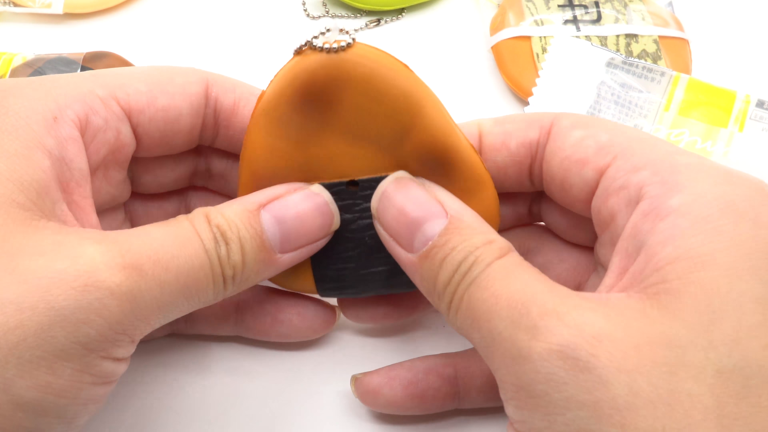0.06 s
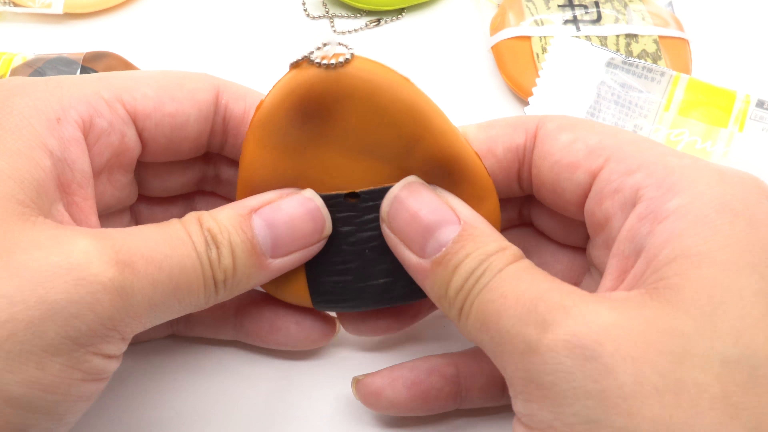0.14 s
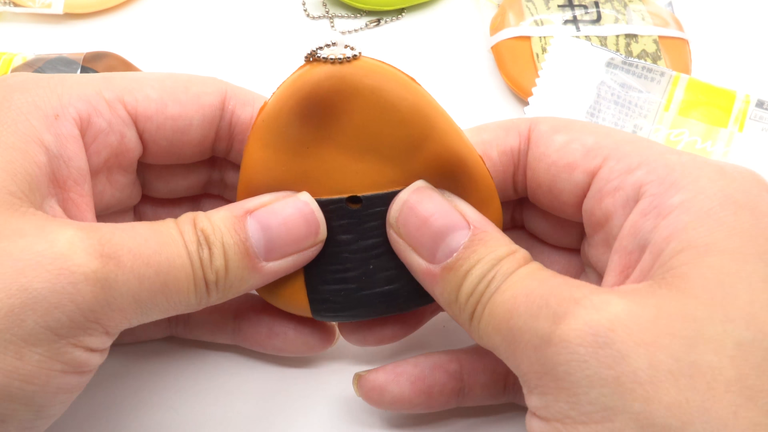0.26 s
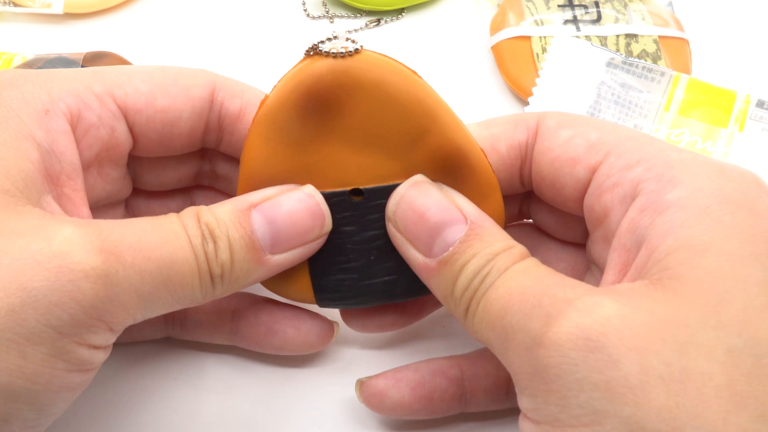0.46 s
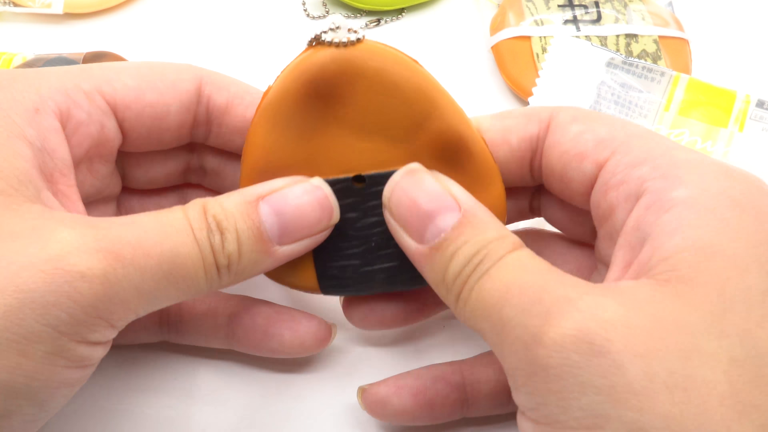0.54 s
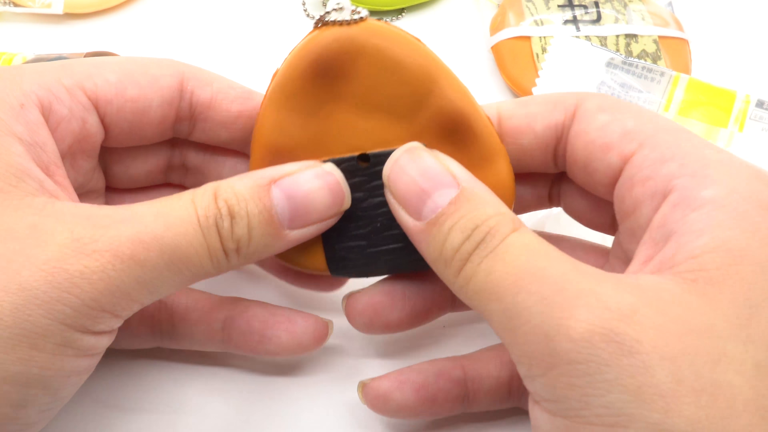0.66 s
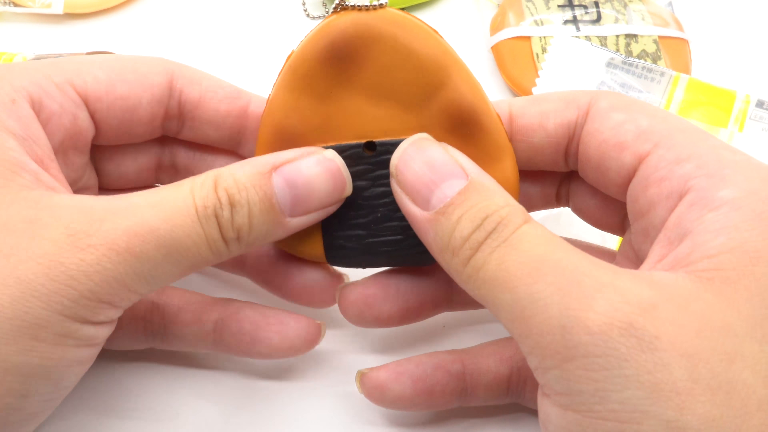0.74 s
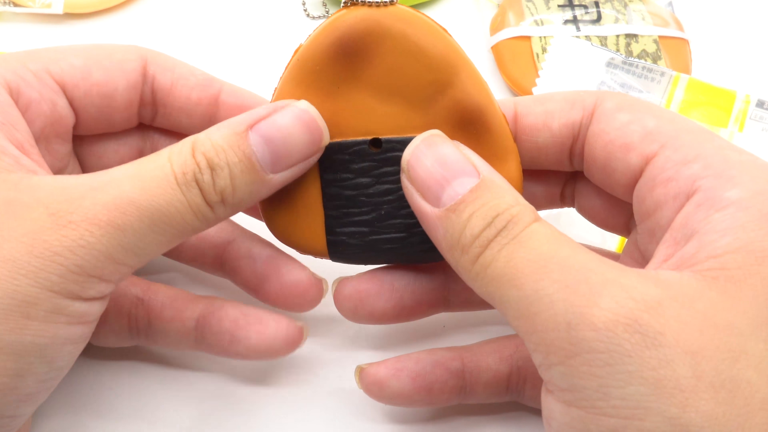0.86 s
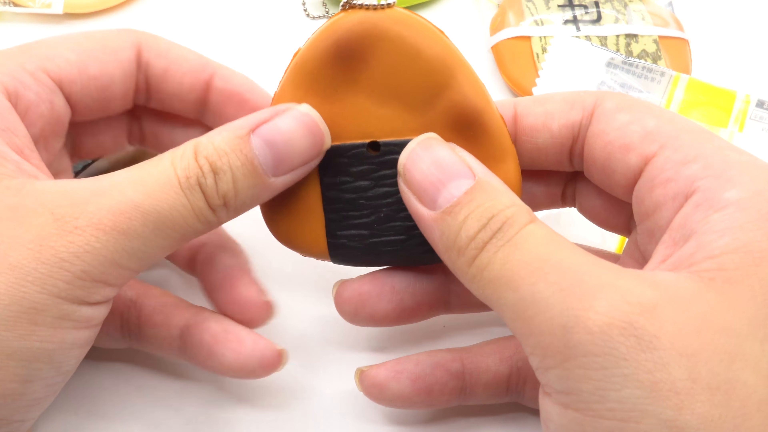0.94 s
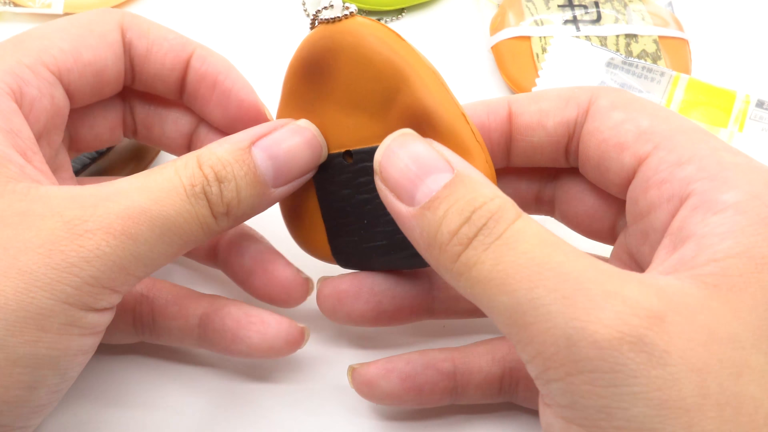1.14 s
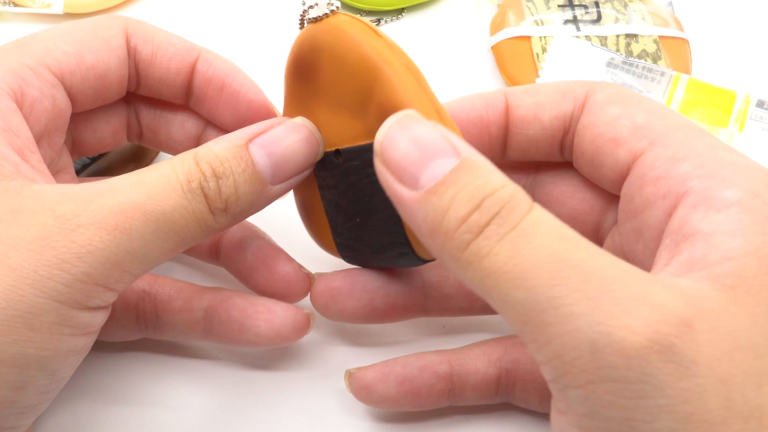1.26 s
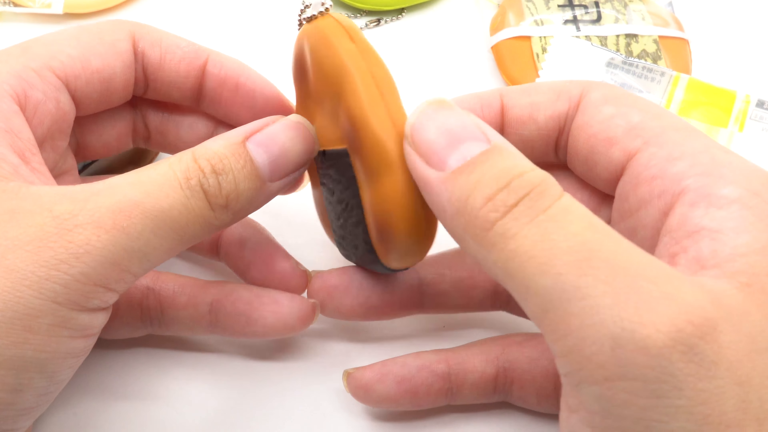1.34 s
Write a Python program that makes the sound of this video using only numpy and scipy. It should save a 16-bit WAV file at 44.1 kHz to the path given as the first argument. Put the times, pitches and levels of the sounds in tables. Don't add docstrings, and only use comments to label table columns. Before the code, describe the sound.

A hollow toy shell snaps sharply under two thumbs, a softer click running straight into a louder crack with a short room echo and faint desk thud; then tiny finger ticks and rubs, close stereo microphone.

```python
import sys
import numpy as np
from scipy import signal
from scipy.io import wavfile

SR = 44100
rng = np.random.default_rng(int(sys.argv[2]) if len(sys.argv) > 2 else 0)


def output_pcm(signal):
    pcm = np.clip(np.atleast_2d(signal).T, -1, 1) * 32767
    wavfile.write(sys.argv[1], SR, np.round(pcm).astype(np.int16))


def invert_db(x):
    u = np.asarray(x, float) / 20
    return 10 ** u


N = 61739

# f/Hz, level/dB per Hz
AIR_SPECTRUM = [(25, -98), (50, -82.5), (150, -82.5), (400, -92.5), (1200, -100), (3500, -105),
                (9000, -107), (15000, -109)]
# f/Hz, level/dB
AIR_SIDE_OVER_MID = [(60, -28), (180, -11.5), (550, -1), (1650, 0.5), (5000, -1), (15000, -3)]
# f/Hz, width/Hz, level/dB
HUM_RESONANCES = [(53.36, 3.8, -55), (101.5, 11.7, -59), (141.2, 11, -63), (285.2, 14, -72),
                  (623, 2.6, -78)]
# t/s, level/dB
HUM_SWELL = [(0.0, -50), (0.07, -64), (0.1, -64), (0.408, -54), (0.45, -70), (0.486, -58.5), (1.066, -60.5),
             (1.102, -52.5), (1.186, -71), (1.242, -51), (1.362, -55.5), (1.4, -64)]
# t/s, level/dB, f/Hz, spread/s, ring length/cycles
FINGER_TICKS = [(0.0616, -41.5, 5850, 0.0084, 5), (.061, -49.5, 900, 0.0022, 8),
                (.0806, -47, 2200, 0.00082, 5), (0.0804, -47, 5530, 0.0012, 3.6),
                (0.081, -53, 900, 0.0046, 6), (0.095, -41, 5350, 0.0066, 6.6),
                (0.095, -55, 2000, 0.0056, 8.4), (.095, -50, 900, 0.0036, 7.3),
                (0.097, -46, 7800, 0.0032, 12), (0.554, -48, 1290, .008, 4.2),
                (.607, -54, 900, 0.0034, 4.5), (.663, -46, 850, 0.0048, 10),
                (.667, -43.5, 1660, 0.0082, 5.1), (.705, -39.5, 4450, .004, 1.8),
                (0.754, -47, 990, 0.0035, 6.2), (.7638, -43, 850, .006, 10),
                (0.7647, -42.5, 1660, 0.00529, 8.5), (0.7636, -45.5, 3300, 0.0088, 5),
                (0.777, -51, 1500, 0.0025, 5.4), (0.8802, -40, 2200, 0.0011, 2.4),
                (1.0809, -48.5, 700, 0.00593, 12), (1.078, -49.5, 1970, 0.004, 12),
                (1.0842, -49.5, 1496, .003, 30), (1.118, -52, 2450, .003, 27)]
# t/s, length/s, level/dB, f/Hz
SKIN_RUBS = [
    (0.061, .07, -66, 6000),
    (0.64, 0.065, -68.5, 7000),
    (0.651, 0.059, -62.5, 1500),
    (0.695, 0.033, -62.5, 7000),
    (0.732, 0.088, -65, 7900),
    (0.87, 0.036, -68.5, 6000),
    (0.91, 0.034, -65.5, 1800),
    (1.028, 0.14, -71, 1600),
    (1.11, 0.034, -70, 3200),
]
# f/Hz, near level/dB, near t60/s, far level/dB, far t60/s
ROOM_DECAY = [(100, -34, .08, -41, .4), (330, -21.5, 0.059, -20.5, 0.64), (694, -19.5, .03, -20.5, 0.39),
              (1210, -8, 0.069, -20, 0.38), (2110, -2.7, 0.037, -10, 0.26), (3300, -16, 0.039, -25, 0.3),
              (7000, -18.5, 0.043, -36, 0.52), (14300, -30, 0.062, -49, 0.19)]
# f/Hz, correlation/1
ECHO_LIKENESS = [(100, .98), (400, 1), (900, 0.56), (2000, 0.13), (4000, 0.04), (12000, .3)]
# t/s, level/dB, pan left minus right/dB, crumbling after-sound level/dB
SHELL_SNAPS = [
    (0.2486, -22, 1.7, -22.5),
    (0.2675, -12, -2, -12),
]
# delay t/s, level/dB
SNAP_SLIPS = [
    [(0.0002, 8), (0.0018, 1.5), (0.0045, -14)],
    [(0.00015, 3.5), (0.0011, -7), (0.0019, -20)],
]
# f/Hz, t60/s, first snap level/dB, second snap level/dB
SHELL_MODES = [(337, 0.014, -12, -7), (900, 0.0078, -5.5, 0), (1640, 0.007, -4, -3),
               (2200, 0.0067, -18, -6.5), (3200, 0.0021, -9.5, -5.5), (4380, 0.0021, -9.5, -8.5),
               (5700, 0.0049, -19.5, -21.5), (7200, 0.0015, -20, -7.5), (9550, 0.0024, -20.5, -20),
               (13300, 0.0013, -30, -25)]
# delay t/s, f/Hz, level/dB, t60/s
DESK_BOOMS = [
    (.010, 100, -31, 0.16),
    (0.014, 155, -38.5, 0.13),
    (.03, 300.2, -55, 0.53),
]

ECHO_RISE_S, ECHO_HOLD_S = 0.0022, 0.0086
FIRST_ECHO_DULL_HZ = 3560
BOOM_RISE_S = 0.0032


def rms_one(x):
    return x / np.sqrt(np.mean(x ** 2) + 1e-20)


def at_hz(points, hz, axis=1):
    points = np.array(points)
    return np.interp(np.log(hz), np.log(points[:, 0]), points[:, axis])


def click(s, db):
    return invert_db(db) * (np.arange(N) == int(s * SR))


def ring(clicks, hz, t60):
    radius = invert_db(-60 / (t60 * SR))
    angle = 2 * np.pi * hz / SR
    feedback = [1, -2 * radius * np.cos(angle), radius * radius]
    return signal.lfilter([0, np.sin(angle)], feedback, clicks + 1e-18)


def bands(size, alike_of, gain_at):
    out = 0
    edges = 20 * 2 ** np.arange(0, 10.1, .5)
    settle = 8000
    white = rng.standard_normal((2, 2, size + settle))
    for k, (low, high) in enumerate(zip(edges, edges[1:])):
        sos = signal.butter(2, [low, min(high, .45 * SR)], "band", fs=SR, output="sos")
        mid, side = signal.sosfilt(sos, white[k % 2])[:, settle:]
        hz = np.sqrt(low * high)
        alike = np.clip(alike_of(hz), -1, 1)
        stereo = np.sqrt(1 + alike) * mid + np.sqrt(1 - alike) * side * [[1], [-1]]
        out = out + gain_at(hz) * stereo
    return out


def air():
    def alike(hz):
        return np.tanh(-at_hz(AIR_SIDE_OVER_MID, hz) * np.log(10) / 20)

    def gain(hz):
        return invert_db(at_hz(AIR_SPECTRUM, hz)) * np.sqrt(SR / 2 / (1 + alike(hz)))

    return bands(N, alike, gain)


def hum():
    s, db = np.transpose(HUM_SWELL)
    swell = invert_db(np.interp(np.arange(N) / SR, s, db - db.mean()))
    out = 0
    for k, (hz, width, level_db) in enumerate(HUM_RESONANCES):
        noise = rng.standard_normal(N + SR)
        tone = ring(noise, hz, 2.2 / width)[SR:]
        out = out + invert_db(level_db) * rms_one(tone) * (swell if k == 0 else 1)
    return out


def ticks():
    out = np.zeros(N)
    draws = rng.random((len(FINGER_TICKS), 2, 5))
    for (s, db, hz, spread, cycles), (when, size) in zip(FINGER_TICKS, draws):
        clicks = click(s, db)
        places = ((s + spread * when) * SR).astype(int)
        np.add.at(clicks, places, (size - .5) * 1.4 * invert_db(db))
        out += ring(clicks, hz, cycles / hz)
    return out


def rubs():
    t, out = np.arange(N) / SR, 0
    for s, length, db, hz in SKIN_RUBS:
        sos = signal.butter(1, [hz * .5, min(hz * 1.7, .45 * SR)], "band", fs=SR, output="sos")
        mid, side = rms_one(signal.sosfilt(sos, rng.standard_normal((2, N))))
        swell = np.sin(np.pi * np.clip((t - s) / length, 0, 1))
        out = out + invert_db(db) * swell * (mid + 0.75 * side * [[1], [-1]])
    return out


def room(x):
    t = np.arange(SR // 2) / SR

    def fade(hz):
        near_db, near_t60, far_db, far_t60 = (at_hz(ROOM_DECAY, hz, axis=k) for k in range(1, 5))
        near = invert_db(near_db - 60 * np.maximum(t - ECHO_HOLD_S, 0) / near_t60)
        far = invert_db(far_db - 60 * t / far_t60)
        return near + far

    echo = bands(len(t), lambda hz: at_hz(ECHO_LIKENESS, hz), fade)
    echo = echo * (1 - np.exp(-(t / ECHO_RISE_S) ** 2))
    return signal.fftconvolve(echo, x[None], axes=1)[:, :N]


def snap(k):
    s, db = SHELL_SNAPS[k][:2]
    push = click(s, db)
    for j, (lag, slip_db) in enumerate(SNAP_SLIPS[k]):
        push = push - click(s + lag, db + slip_db) * (-1) ** j
    out = 0
    for j, mode in enumerate(SHELL_MODES):
        sign = (-1) ** (j + k + 1)
        out = out + sign * invert_db(mode[2 + k]) * ring(push, mode[0], mode[1])
    return out


def booms():
    t, out = np.arange(N) / SR, 0
    for lag, hz, db, t60 in DESK_BOOMS:
        since = np.maximum(t - SHELL_SNAPS[-1][0] - lag, 0)
        envelope = invert_db(db - 60 * since / t60) * (1 - np.exp(-since / BOOM_RISE_S))
        out = out + envelope * np.sin(2 * np.pi * hz * since)
    return out


def scene():
    touches = ticks()
    direct = 0
    for k, row in enumerate(SHELL_SNAPS):
        pan = invert_db([[row[2] / 2], [-row[2] / 2]])
        direct = direct + snap(k) * pan
    first, second = (click(row[0], row[3]) for row in SHELL_SNAPS)
    pole = np.exp(-2 * np.pi * FIRST_ECHO_DULL_HZ / SR)
    dull_first = signal.lfilter([1 - pole], [1, -pole], first)
    sent = dull_first + second + invert_db(-26) * touches
    return direct + touches + room(sent) + booms() + air() + hum() + rubs()


def low_pass(x):
    return signal.sosfilt(signal.butter(12, 16650, fs=SR, output="sos"), x)


def record(dry):
    cut = signal.sosfilt(signal.cheby2(16, 30, 15900, fs=SR, output="sos"), dry)
    cut = signal.sosfilt(signal.cheby2(16, 50, 16700, fs=SR, output="sos"), cut)
    cut = signal.sosfilt(signal.butter(2, 28, "high", fs=SR, output="sos"), cut)
    return low_pass(cut)


dry = scene()
out = record(dry)
output_pcm(out)
```